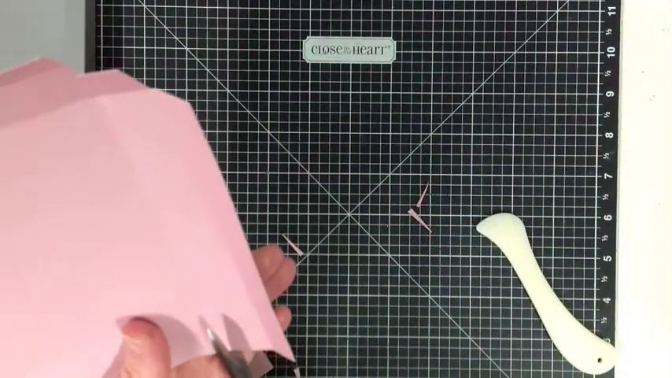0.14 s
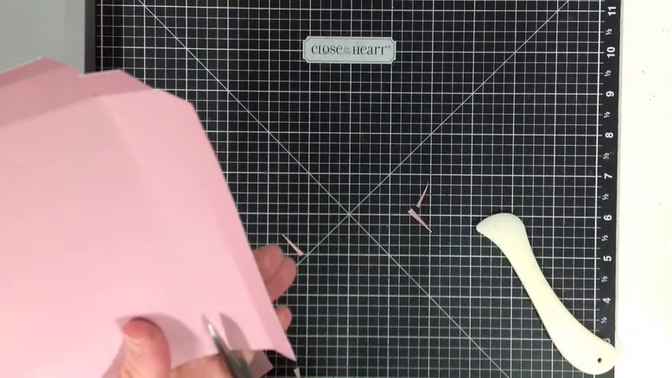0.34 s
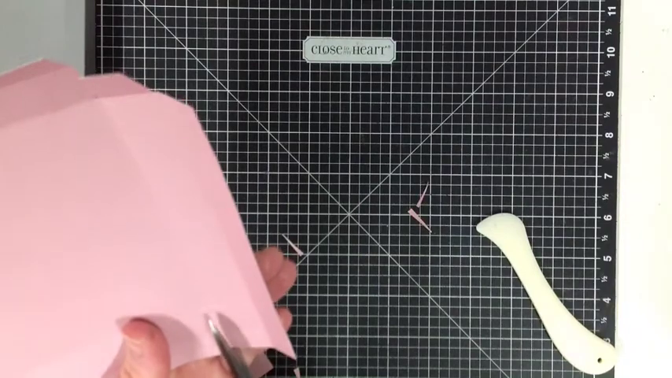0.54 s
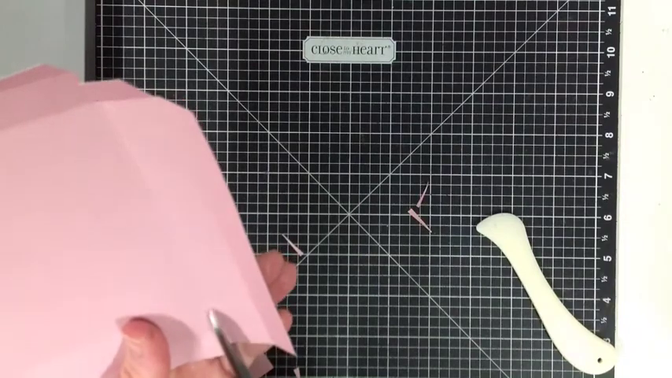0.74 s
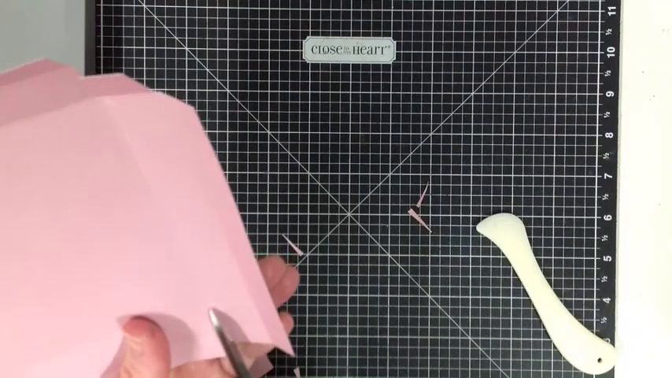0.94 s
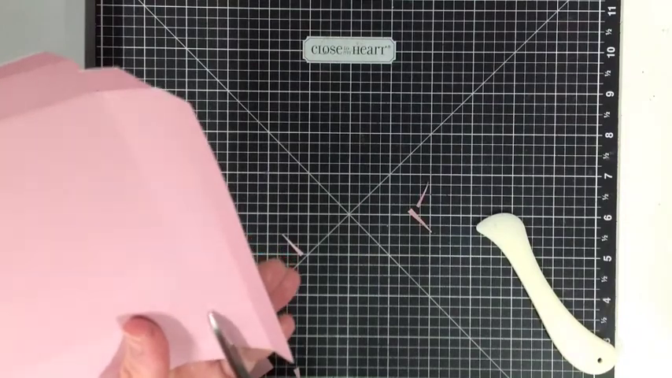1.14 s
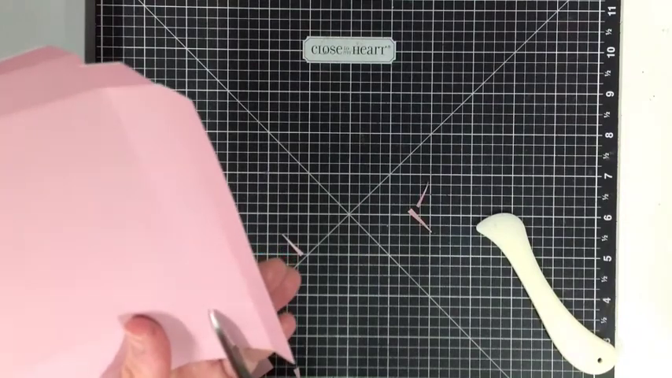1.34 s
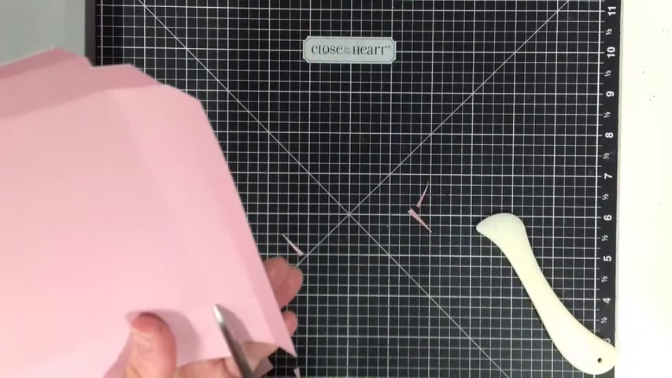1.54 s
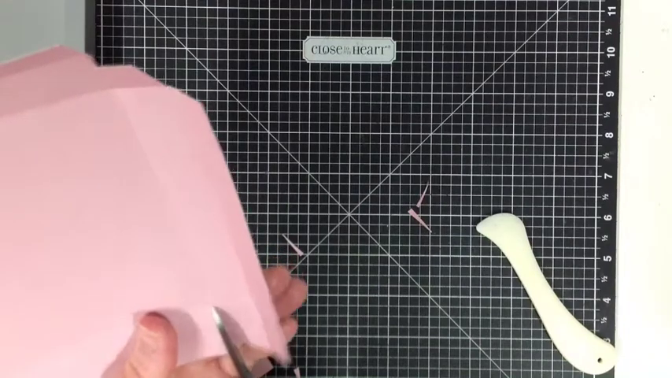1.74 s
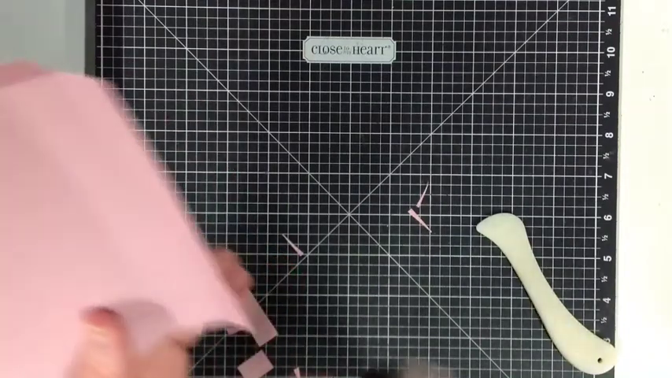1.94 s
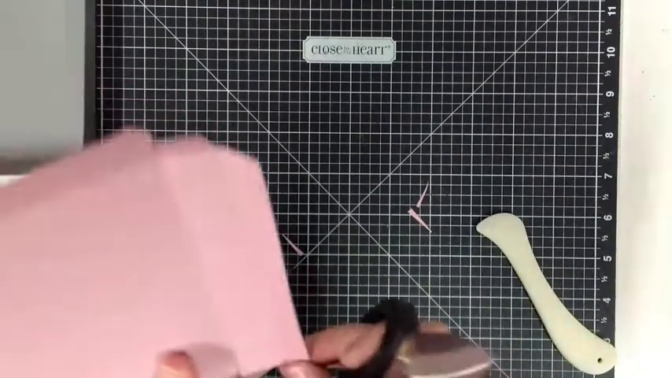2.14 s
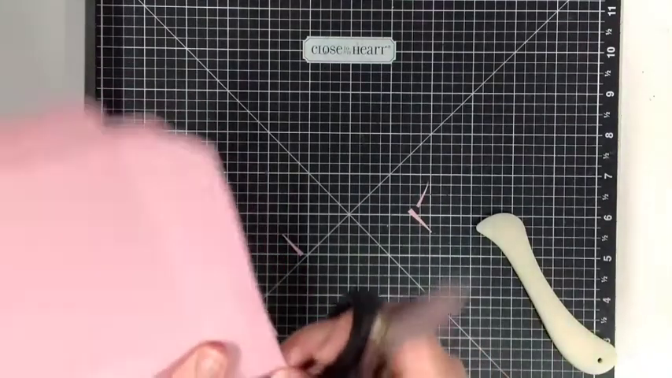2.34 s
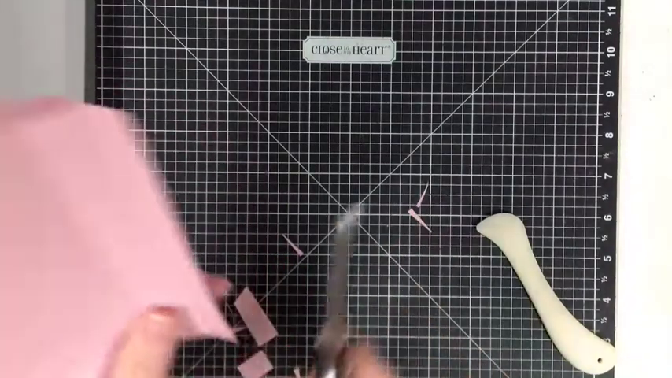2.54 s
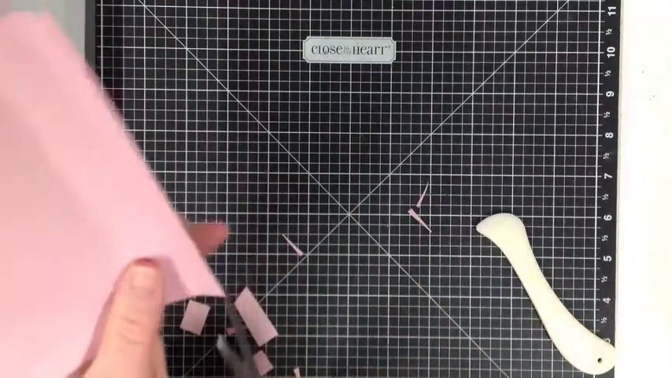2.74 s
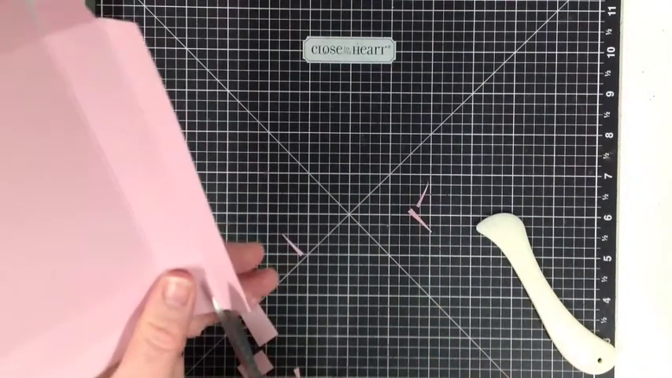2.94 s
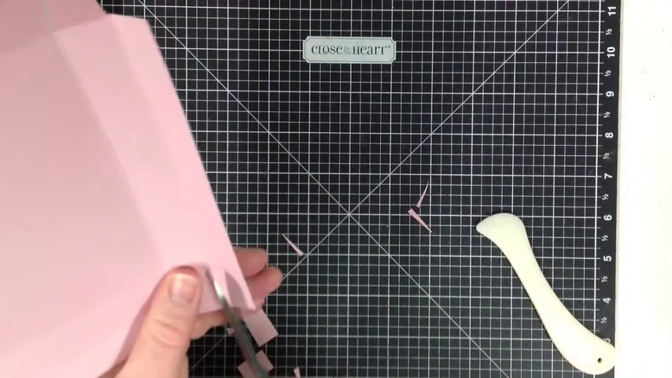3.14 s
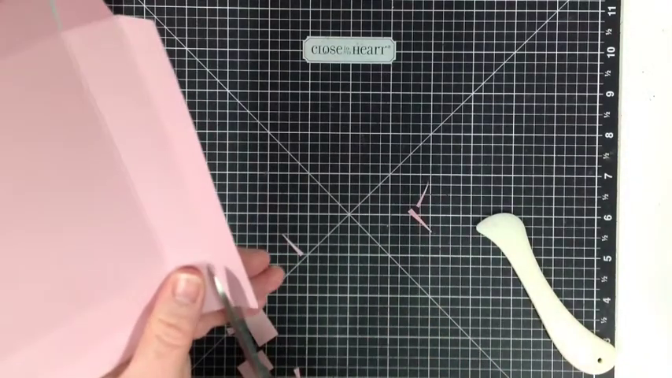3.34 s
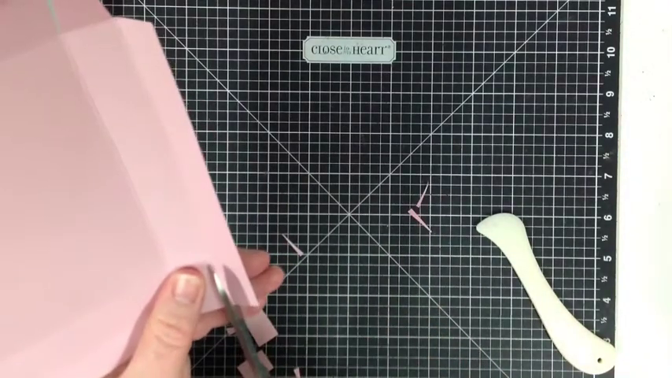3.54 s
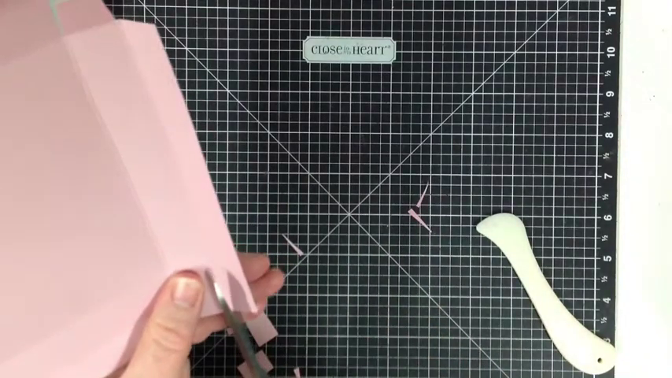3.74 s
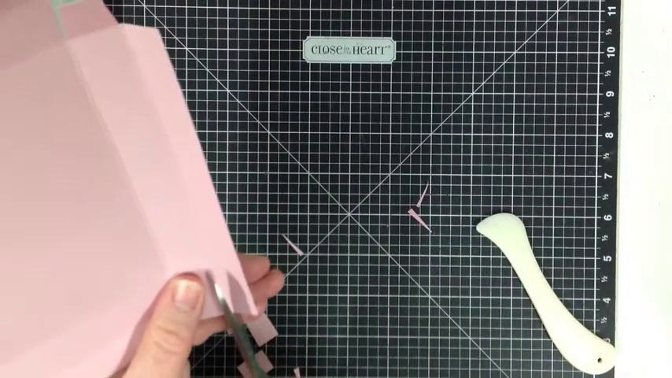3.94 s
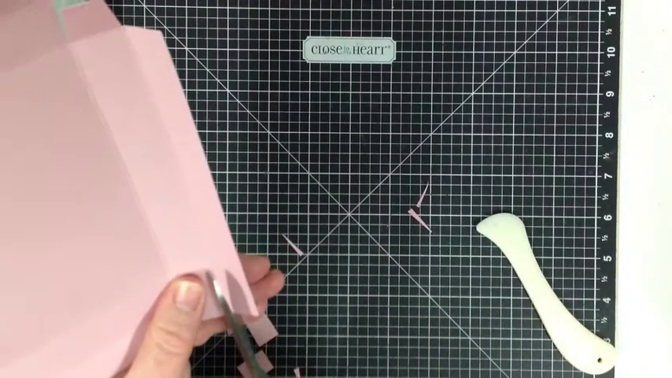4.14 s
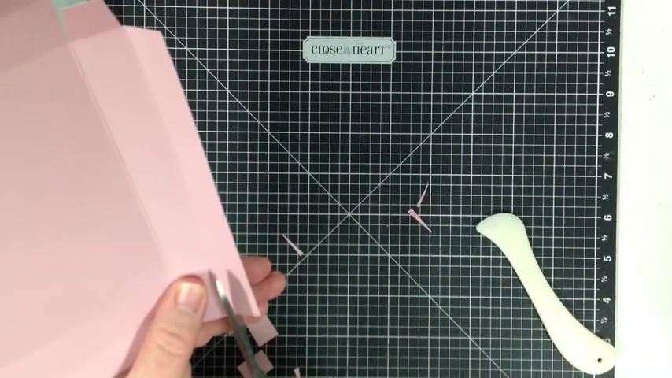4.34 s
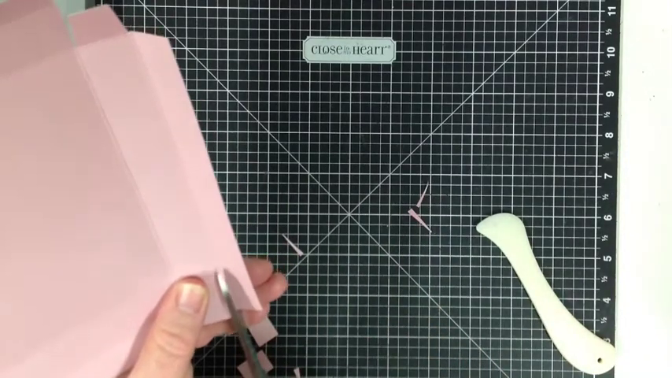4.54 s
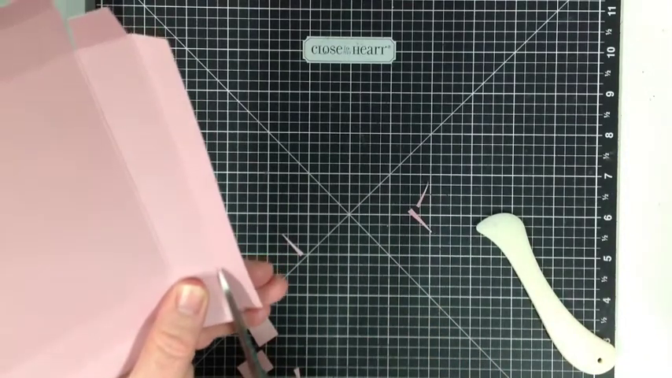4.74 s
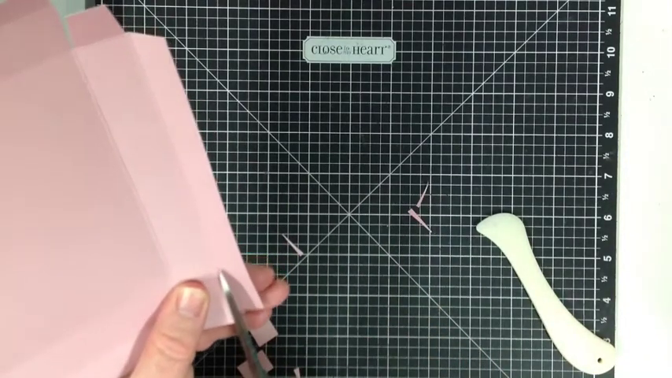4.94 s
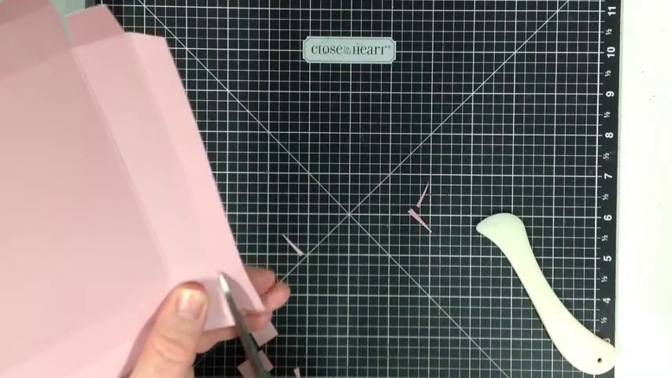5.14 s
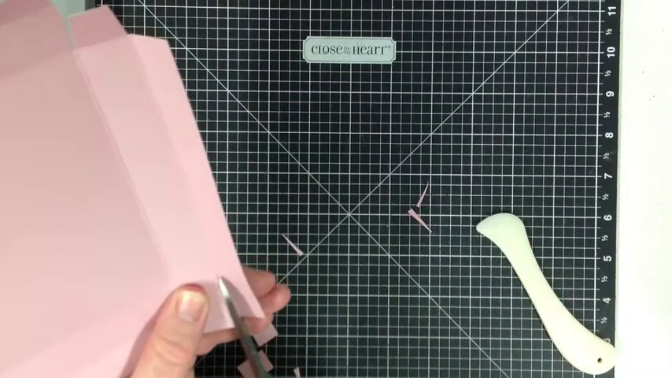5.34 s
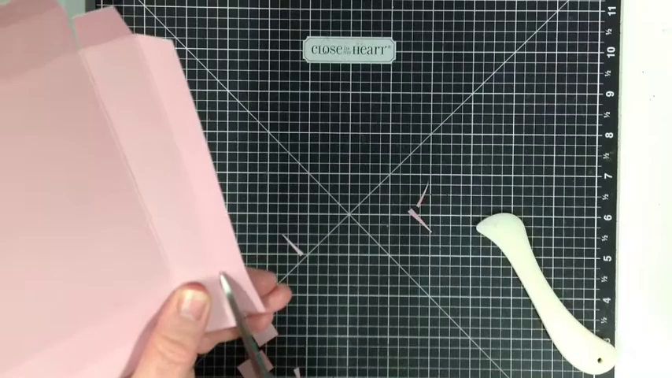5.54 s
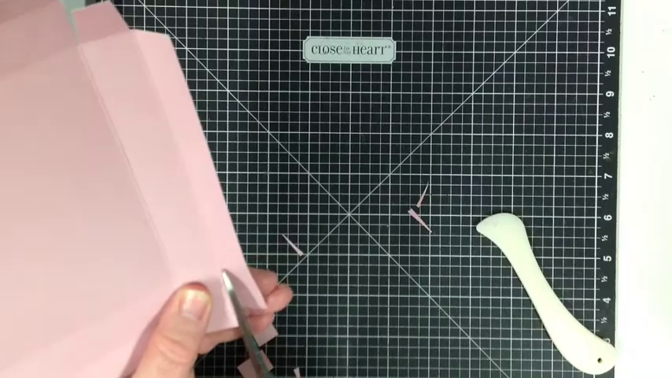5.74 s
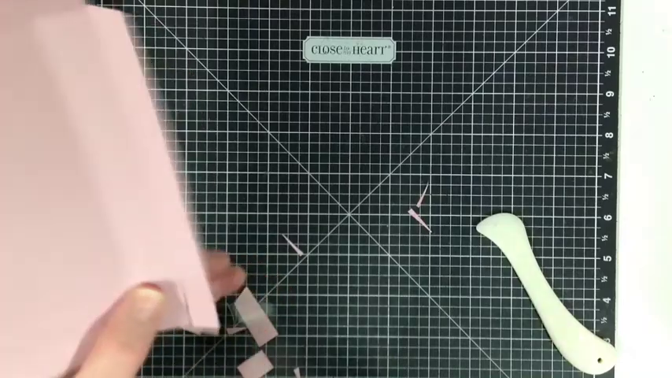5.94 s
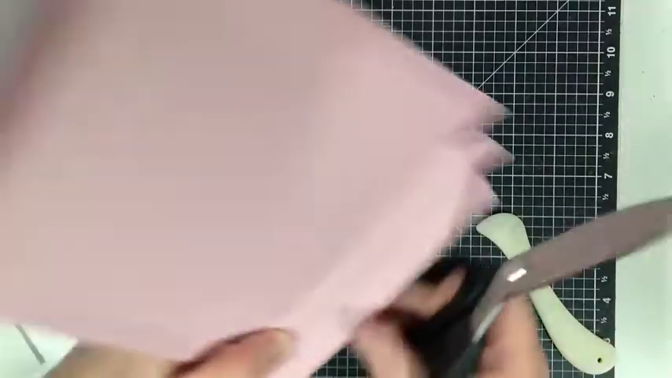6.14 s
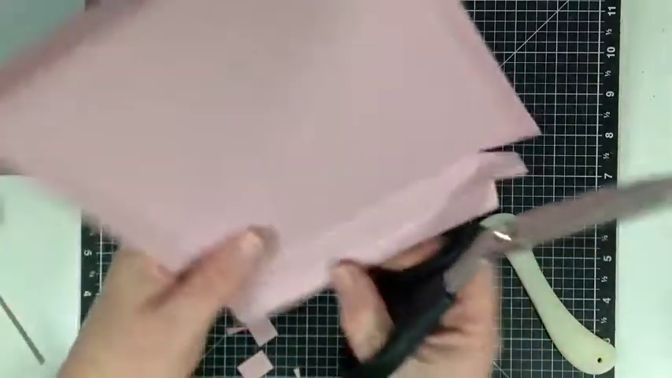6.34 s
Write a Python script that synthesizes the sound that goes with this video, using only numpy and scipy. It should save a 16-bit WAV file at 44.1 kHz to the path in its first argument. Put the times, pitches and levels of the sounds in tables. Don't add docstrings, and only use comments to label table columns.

```python
import sys
import numpy as np
from scipy import signal
from scipy.fft import rfft, irfft
from scipy.io import wavfile

SR = 44100
rng = np.random.default_rng(int(sys.argv[2]) if len(sys.argv) > 2 else 0)


def ratio(d):
    e = np.asarray(d, float) / 20
    return 10 ** e


def wav_out(sig):
    wavfile.write(sys.argv[1], SR, np.round(np.clip(np.atleast_2d(sig).T, -1, 1) * 32767).astype(np.int16))


N = 286209


def rms_one(x):
    return x / np.sqrt(np.mean(x ** 2) + 1e-20)


def in_time(rows, outside=None):
    s, *columns = np.transpose(rows)
    t = np.arange(N) / SR
    return np.array([np.interp(t, s, column, outside, outside) for column in columns])


def drift(per_s, size):
    points = rng.standard_normal(int(size * per_s / SR) + 2)
    return np.interp(np.arange(size) * per_s / SR, np.arange(len(points)), points) * 1.22


def resonate(x, modes):
    out = 0
    for k, (hz, width_hz, db) in enumerate(modes):
        r = np.exp(-np.pi * width_hz / SR)
        zeros = [(1 - r * r) / 2, 0, (r * r - 1) / 2]
        poles = [1, -2 * r * np.cos(2 * np.pi * hz / SR), r * r]
        out = out + (-1) ** k * ratio(db) * signal.lfilter(zeros, poles, x)
    return out


def ring(hz, t60, size):
    t = np.arange(size) / SR
    return np.sin(2 * np.pi * hz * t) * ratio(-60 * t / t60)


def burst(s, rise_ms, fall_ms):
    at = np.arange(max(round((s - .07) * SR), 0), min(round((s + .08) * SR), N))
    ms = (at / SR - s) * 1000
    rise = np.exp(-1.2 * (ms / max(rise_ms, .3)) ** 2)
    fall = np.exp(-(np.abs(ms) / max(fall_ms, .3)) ** 1.6)
    return at, np.where(ms < 0, rise, fall)


# frequency in Hz, level in dB per Hz.
HISS = [(15, -48), (25, -24), (75, -19.5), (91, -19), (214, -3.5), (320, -11), (454, -5), (548, -9.5),
        (938, -9), (1440, -13.5), (2670, -14), (3690, -16.5), (15300, -18)]


def hiss():
    hz, db = np.transpose(HISS)
    bins = np.maximum(np.fft.rfftfreq(N, 1 / SR), 1)
    colour = ratio(np.interp(np.log(bins), np.log(hz), db))
    return ratio(-64.5) * rms_one(irfft(rfft(rng.standard_normal(N)) * colour, N))


# time in seconds, level in dB.
RUMBLE = [(0, -72), (3.9, -75.5), (4.6, -70), (5.2, -71.5), (5.8, -67.5), (6.49, -71)]
# time in seconds, firing rate in Hz, level in dB, favoured pitch in Hz.
ENGINE = [
    (4.3, 73.7, -100, 150),
    (4.6, 77.5, -74, 160),
    (4.9, 81, -75, 246),
    (5.1, 81.7, -72, 189),
    (5.22, 82, -65, 204),
    (5.45, 84.9, -68.5, 254),
    (5.65, 90, -82, 241),
    (6.1, 95.3, -66.5, 207),
    (6.49, 96, -69, 200),
]
FAVOURED_WIDTH_HZ, ELSEWHERE_DB, ORDER_SWAY_DB = 36, -20, 2


def street():
    hz, level_db, favoured_hz = in_time(ENGINE)
    turns = 2 * np.pi * np.cumsum(hz) / SR
    engine = 0
    for order in (1, 2, 2.5, 3):
        off_favoured = (order * hz - favoured_hz) / FAVOURED_WIDTH_HZ
        path_db = ELSEWHERE_DB * (1 - np.exp(-off_favoured ** 2))
        sway_db = ORDER_SWAY_DB * drift(7, size=N)
        engine = engine + np.sqrt(2) * ratio(level_db + path_db + sway_db) * np.sin(order * turns)
    on = np.arange(N) > ENGINE[0][0] * SR
    rumble = resonate(rng.standard_normal(N), [(102.6, 39, -2.5), (177.0, 45, 4.0), (312, 82, 0.5)])
    return on * engine + ratio(in_time(RUMBLE)[0]) * rms_one(rumble)


# peak in seconds, rise in ms, fall in ms, level in dB.
NIBBLING = [(0.257, 1, 4, -67), (0.389, 2, 6.9, -54.5), (0.418, 1, 1.6, -51.5), (0.424, 3.8, 4.7, -54),
            (0.451, 0.91, 2.4, -55), (0.458, 3, 6.4, -53), (0.479, 1.2, 2.8, -56.5), (0.525, 2.3, 16, -56),
            (0.552, 2.3, 2.7, -53), (0.572, 1.5, 4.8, -51), (0.59, 23, 5, -56), (0.605, 1, 2, -56)]
FIRST_CUT = [(0.637, 1.2, 2.6, -40.5), (0.642, 5.1, 6.1, -47), (0.668, 3.2, 5.6, -44.5),
             (0.686, 5.3, 10, -48.5), (0.713, 9.7, 9.9, -49.5), (0.733, 4, 5.6, -49),
             (0.755, 4.9, 6.6, -51.5), (0.847, 4.6, 4.6, -42.5), (0.868, 2.8, 1.3, -45),
             (0.883, 1.4, 5, -43.5), (0.875, 10, 3.2, -48), (0.899, 8.4, 5.7, -47.5), (0.914, 4, 5, -52),
             (0.94, 3, 0.9, -56), (1.183, 3, 16, -62), (1.215, 7.7, 8.4, -58.5)]
SECOND_CUT = [(1.528, 0.72, 4.6, -46), (1.538, 0.87, 3.8, -49), (1.566, 1.4, 8.5, -42),
              (1.593, 1.4, 8, -43.5), (1.604, 6, 8.5, -43), (1.619, 8, 1.8, -46), (1.6345, 1.1, 3.3, -34.5),
              (1.646, 3, 9.9, -50), (1.75, 12, 13, -60), (1.799, 11, 13, -52), (1.823, 7.1, 14, -41.5),
              (1.845, 9.4, 5.9, -31), (1.8535, 2.9, 4.5, -28.5), (1.862, 4, 9.2, -43)]
THIRD_CUT = [(3.569, 1.1, 1.5, -64), (4.361, 1.4, 2.1, -62), (4.424, 0.7, 2.3, -54.5),
             (4.43, 1.5, 1.6, -59), (4.461, 4.3, 5.7, -51), (4.499, 1.1, 14, -56), (4.504, 1.7, 3.2, -47.5),
             (4.531, 1.7, 7.6, -51), (4.547, 2, 9.7, -54.5), (4.568, 1.7, 1.4, -51), (4.582, 2.6, 6.4, -50),
             (4.591, 3.3, 4, -51), (4.601, 1.2, 2.8, -53), (4.609, 0.85, 2.7, -55.5), (4.624, 1.1, 1, -57),
             (4.646, 1, 1, -53), (4.658, 7.3, 2, -53), (4.669, 1, 4, -54), (4.681, 2.6, 4, -50.5),
             (4.697, 2.3, 4.3, -44), (4.717, 3.8, 4.5, -49.5), (4.738, 1, 2.5, -51), (4.752, 1.7, 3.2, -50),
             (4.778, 1, 3, -48), (4.783, 1.1, 5, -44.5), (4.808, 0.9, 5.1, -48.5), (4.835, 2.7, 3.4, -51),
             (4.846, 1.4, 2.3, -49)]
FOURTH_CUT = [(5.04, 3.8, 8.5, -47.5), (5.062, 4.6, 3.2, -49.5), (5.074, 4.6, 5.4, -47),
              (5.086, 1.5, 2.4, -43.5), (5.596, 3, 4, -61), (5.614, 1.9, 3.6, -50), (5.641, 1.8, 4.3, -44),
              (5.668, 1.5, 3, -49), (5.673, 3.1, 3.5, -38.5), (5.693, 9.3, 8.7, -67), (5.857, 14, 38, -63),
              (5.885, 10.2, 7.4, -48), (5.897, 8.8, 6.5, -42), (5.944, 36, 11, -50)]
# peak in seconds, rise in ms, fall in ms, level in dB.
REOPENING = [
    (2.179, 0.56, 3.9, -50),
    (2.399, 0.62, 2.1, -49.5),
    (2.463, 33, 3, -53.5),
    (2.4652, 2.1, 1.3, -34),
    (2.468, 1, 1.7, -39),
    (2.63, 7.2, 27, -61),
    (2.67, 11, 10, -64),
    (2.705, 2, 1, -67),
]
# peak in seconds, rise in ms, fall in ms, level in dB.
TURNING = [(6.1852, 0.3, 13.8, -41), (6.255, 0.94, 2.6, -47), (6.281, 0.84, 2.9, -37),
           (6.324, 3.8, 1.3, -45), (6.333, 1.1, 2.3, -41), (6.3695, 1.6, 3.5, -37), (6.379, 2.6, 2.9, -36),
           (6.387, 3.1, 6.7, -37), (6.426, 3.7, 18, -47.5), (6.447, 6.7, 3.3, -45), (6.47, 1, 1.7, -51)]
# peak in seconds, rise in ms, fall in ms, level in dB.
FLEXES = [(1.451, 5, 2.4, -60), (1.553, 0.92, 3.7, -60), (1.852, 3.4, 6, -42), (1.872, 17, 16, -49),
          (2.197, 1.1, 5.1, -58.5), (2.399, 0.55, 2.2, -52.5), (2.478, 0.76, 1.8, -46.5),
          (2.494, 9.5, 2.7, -55.5), (6.195, 6.8, 7.2, -50), (6.379, 4, 3.9, -40), (6.41, 14, 7.8, -57.5),
          (6.447, 7.7, 3.6, -57)]
# peak in seconds, rise in ms, fall in ms, level in dB.
SETTLING = [
    (3.435, 10, 12, -70),
    (3.736, 1.4, 2.4, -62),
    (3.76, 8.8, 8, -66),
    (5.213, 6, 11, -62.5),
    (5.43, 4, 4, -66),
    (5.466, 2.4, 4, -62),
]
# table of slips, steel level in dB and belly level in dB, both relative to the card.
STROKES = [
    (NIBBLING, 1.1, -9.5),
    (FIRST_CUT, -2.3, -7),
    (SECOND_CUT, -1, -14),
    (REOPENING, 2.5, -5.5),
    (THIRD_CUT, 3.7, -5.5),
    (FOURTH_CUT, 2.8, -7.5),
    (TURNING, -6.5, -7.5),
    (FLEXES, -6, 7.2),
    (SETTLING, -4, -3),
]


def fibres(per_s, spread_db):
    sizes = ratio(spread_db * np.minimum(rng.exponential(1, N), 5)) * rng.choice([-1, 1], N)
    breaks = rms_one(sizes * (rng.random(N) < per_s / SR))
    for slips, *_ in STROKES:
        for s, rise_ms, *_ in slips:
            if rise_ms < 1.7:
                at = round(s * SR)
                breaks[at] = ratio(11) * np.sign(sizes[at])
    return breaks


# steel level in dB, belly level in dB, then pressure as pairs of time in seconds and level in dB.
RUBBING = [
    (5, -2, [(0.37, -85), (0.618, -65), (0.748, -84), (0.97, -80)]),
    (-7, -8, [(1.15, -70), (1.3, -68)]),
    (4, 0, [(1.5, -71.5), (1.738, -73), (1.862, -64), (1.95, -84)]),
    (4, -8, [(2.178, -62.5), (2.23, -59.5), (2.354, -58), (2.462, -76.5), (2.73, -72.5)]),
    (-3, 3, [(3.38, -90), (3.8, -79)]),
    (1.5, 1.5, [(4.4, -78), (4.678, -64.5), (4.834, -67), (4.9, -75)]),
    (-13, -2, [(5.02, -75), (5.228, -70.5), (5.5, -76), (5.9, -76)]),
    (2, -7, [(5.9, -67), (6.186, -71)]),
    (3.5, -2.5, [(6.186, -57.5), (6.248, -59), (6.362, -54), (6.434, -61), (6.49, -68)]),
]


def strain():
    power = np.zeros((3, N))
    for steel_db, belly_db, pressure in RUBBING:
        share_db = np.array([[0], [steel_db], [belly_db]])
        power += ratio(2 * (in_time(pressure, outside=-150) + share_db))
    for slips, steel_db, belly_db in STROKES:
        share_db = np.array([[0], [steel_db], [belly_db]])
        for s, rise_ms, fall_ms, db in slips:
            at, shape = burst(s, rise_ms, fall_ms)
            power[:, at] += ratio(2 * (db + share_db)) * shape
    return np.sqrt(power)


GRIPS = [0, 1.1, 2.05, 4.2, 5.8, 6.15]
# frequency in Hz, width in Hz, then level in dB in grips 1 to 6.
CARD = [(986, 490, 5, 5.5, -6.5, -2.5, -3, -0.5), (1385, 523, 5.5, 5, 3, -0.5, 0.5, 2),
        (1810, 165, 3, -2, 3.5, -2, 1.5, 3), (2250, 440, -0.5, -3.5, -1.5, -7, -2, -3),
        (3150, 550, 2.5, 2, 4.5, -0.5, 1, 2), (3630, 1010, 1, 1, 1.5, -6, -3, -2.5),
        (1120, 43, -19, -4, 0, -9, -11, -17), (1570, 47, -5, 3.5, -6, -12, -7, -6)]
STEEL = [(4290, 590, 1, -1, 4, -4, 4.5, 0), (5030, 1140, -3.5, -2.5, 3, -1.5, 3, 1.5),
         (6300, 1460, -4, -2, 3, -1, 1.5, -0.5), (7390, 810, 2.5, 2.5, 5, 3.5, 3, 2.5),
         (9230, 3500, -3.5, -4, 1.5, -3, 2.5, 0.5), (11620, 3200, -3.5, -3, 2.5, -3, 3, 1.5),
         (14300, 2800, -9, -7.5, -0.5, -12.5, -1, -2), (6250, 66, -6, 6, -3, 1, -7, -6),
         (7430, 55, 0, 4.5, -3, 4, -4, -6), (3144, 66, -4, 5, -5, 1, -6, -9)]
BELLY = [(206, 97, -6.5, -3.5, 1, -6, -0.5, -9.5), (339, 104, 2.5, 3.5, 3.5, -4, 5, 4.5),
         (434, 178, 1.5, 0.5, 2.5, -3, 1.5, 1.5), (720, 81, -2.5, -7.5, -23, 0.5, -4.5, 3.5)]


def tearing(breaks):
    out = np.zeros(N)
    edges = [round(s * SR) for s in GRIPS] + [N]
    for pull, body in zip(strain(), (CARD, STEEL, BELLY)):
        force = pull * breaks
        for grip, (start, end) in enumerate(zip(edges, edges[1:])):
            modes = [(hz, width_hz, db[grip]) for hz, width_hz, *db in body]
            scale = np.linalg.norm(resonate(signal.unit_impulse(SR // 10), modes))
            for k, mode in enumerate(modes):
                met = ratio(1.2 * drift(55, size=end - start))
                out[start:end] += (-1) ** k * resonate(force[start:end] * met, [mode]) / scale
    return out


# time in
# seconds, peak in dB, pitch in Hz.
CRACKS = [(0.3893, -46, 1210), (0.4186, -41, 7280), (0.4226, -43, 1640), (0.4579, -45, 7490),
          (0.5531, -38, 7190), (0.573, -43, 1390), (0.6043, -39, 4440), (0.668, -36, 1420),
          (0.7015, -43, 3190), (0.8475, -33, 1320), (0.8646, -36, 1160), (0.8689, -35, 1210),
          (0.8821, -37, 1120), (0.8983, -37, 1250), (1.5242, -52, 8530), (1.5373, -37, 2330),
          (1.5404, -45, 1030), (1.5523, -43, 2300), (1.552, -46, 12000), (1.5687, -32.5, 1030),
          (1.5984, -32, 3450), (1.6028, -34, 3060), (1.6337, -29, 1160), (1.8108, -44, 8440),
          (1.8229, -30, 7620), (1.8404, -27, 1120), (1.8622, -27, 1030), (2.1991, -49, 1160),
          (2.3988, -34.5, 2710), (2.4525, -42, 7750), (2.4655, -24, 6200),
          (3.5688, -46, 7800), (3.7366, -48, 5300), (4.4227, -40, 11240), (4.4263, -39, 9560),
                      (4.4301, -39, 7450), (4.4571, -36, 8910), (4.461, -35, 5990), (4.4994, -39, 8100),
                      (4.5035, -30, 11670), (4.5093, -34, 9600), (4.5625, -43, 10250), (4.5685, -39, 9430),
                      (4.5799, -38, 7620), (4.6243, -40, 5470), (4.6705, -41, 7410), (4.716, -41, 1340),
                      (4.7423, -48, 1030), (4.7541, -35, 7360), (4.7833, -37, 9430), (4.787, -31, 6850),
                      (4.8094, -28, 6630), (4.8466, -37, 3300), (5.0405, -31, 7920), (5.0734, -34.5, 1200),
                      (5.0858, -31, 5560), (5.4658, -50, 3400), (5.6168, -39.5, 1150), (5.6424, -27, 7300),
                      (5.6464, -32, 7150), (5.6665, -33, 5340), (5.6697, -34, 7060), (5.8615, -48, 6160),
                      (5.8866, -34.5, 1120), (5.8947, -28, 3400), (5.9085, -43, 1420), (6.1857, -34, 1160),
                      (6.2386, -46, 2280), (6.255, -35.5, 1290), (6.2918, -43, 1030), (6.317, -34, 1700),
                      (6.3237, -29, 3010), (6.3338, -24, 9300), (6.3362, -27, 8500), (6.363, -42, 8000),
                      (6.3695, -30, 1030), (6.3855, -28, 3530), (6.394, -29, 3880), (6.4307, -36, 3490),
                      (6.4434, -34, 1030), (6.4705, -40, 3270)]
CRACK_T60_S, CRACK_CYCLES, CRACK_TICK_DB = .0015, 3.5, -5


def cracks():
    size = SR // 50
    out = np.zeros(N + size)
    rows = CRACKS
    for (s, db, hz), sign in zip(rows, rng.choice([-1, 1], len(rows))):
        pulse = ring(hz, CRACK_T60_S + CRACK_CYCLES / hz, size=size)
        pulse = pulse / np.abs(pulse).max() - ratio(CRACK_TICK_DB) * signal.unit_impulse(size)
        at = round(s * SR)
        out[at:at + size] += sign * ratio(db) * pulse
    return out[:N]


# peak in seconds, fall in ms, level in dB, pitch in Hz, width in Hz.
SQUEAKS = [(1.639, 2.4, -28.5, 3100, 600), (1.852, 2.4, -31.5, 3150, 400), (1.853, 2.3, -34, 12500, 1200),
           (2.4, 2.6, -45.5, 2830, 1200), (2.468, 2.25, -29.5, 3600, 500), (2.632, 10, -62, 6700, 400),
           (2.656, 6, -61, 11900, 500), (2.667, 7, -64, 14600, 500), (2.64, 9, -67, 9700, 500),
           (2.647, 7.1, -57, 3620, 250), (2.672, 10, -64, 7300, 400), (6.317, 0.91, -35, 2110, 915),
           (6.335, 1.4, -40, 8800, 1800), (6.3754, 0.59, -28.5, 2850, 1980), (6.387, 3.8, -34, 3630, 348),
           (6.393, 2.5, -38, 3780, 400), (0.58, 6.4, -56, 2200, 250), (0.53, 8, -56, 7550, 700),
           (0.64, 4, -51, 7500, 2500), (1.54, 5, -50.5, 2250, 300), (1.605, 11, -50, 3120, 250),
           (4.754, 3, -57, 3400, 300), (4.811, 3, -55, 3230, 300), (5.042, 4.9, -54, 3400, 300),
           (5.045, 7.4, -47, 7000, 900), (5.087, 2.7, -48, 6770, 1500), (5.887, 2.5, -50, 1060, 200),
           (5.896, 3.3, -46, 3480, 500), (5.92, 12, -54, 1730, 150), (5.938, 8, -48, 5710, 300),
           (5.942, 5.5, -45, 11040, 800), (5.897, 3.6, -43, 12300, 2000), (4.812, 4.4, -53, 8000, 4000),
           (4.793, 3.5, -54, 7000, 3000), (6.325, 2.2, -44, 3100, 500)]


def squeaks(breaks):
    out = np.zeros(N)
    for s, fall_ms, db, hz, width_hz in SQUEAKS:
        at, shape = burst(s, 0.68 * fall_ms, fall_ms)
        scale = np.sqrt(np.pi * width_hz / SR / 2)
        out[at] += resonate(np.sqrt(shape) * breaks[at], [(hz, width_hz, db)]) / scale
    return out


# time in seconds, pop level in dB, pop pitch in Hz, cycles it rings, belly level in dB.
SNAPS = [
    (1.6382, -12.5, 1265, 11.8, -30),
    (5.6755, -18, 1160, 9.1, -46),
    (6.3751, -6, 990, 4.1, -39),
    (2.4661, -15, 1120, 13.3, -20),
    (1.8528, -11.5, 1245, 10.4, -22.5),
    (6.2812, -23, 760, 9.5, -36),
]
THUD_HZ = 421


def snaps():
    size = SR // 4
    out = np.zeros(N + size)
    t = np.arange(size) / SR
    thud = ring(THUD_HZ, 0.025, size=size)
    thud += 0.43 * ring(THUD_HZ * 0.777, 0.048, size=size)
    thud += 0.17 * ring(144, 0.12, size=size)
    thud *= np.tanh(t / .001)
    for s, db, pop_hz, cycles, belly_db in SNAPS:
        pop = ring(pop_hz, cycles / pop_hz, size=size)
        pop += .03 * ring(pop_hz * .97, .07, size=size)
        pop += .5 * ring(pop_hz * 2.2, .004, size=size)
        at = round(s * SR)
        out[at:at + size] -= ratio(db) * pop * np.tanh(t / .0004) + ratio(belly_db) * thud
    return out[:N]


# peak in seconds, rise in ms, fall in ms, level in dB, pitch in Hz, glide in Hz per ms.
WOBBLES = [(1.651, 4, 11, -49, 342, 0), (1.875, 14, 8.1, -36.5, 466, 4.1),
           (1.874, 9.4, 10, -46.5, 235, -0.5), (1.895, 13, 17.4, -45.5, 335, -0.5),
           (1.905, 6, 7, -50, 507, 1), (1.877, 6, 8, -44, 935, -1), (2.245, 8, 10, -51.5, 253, 0.5),
           (2.477, 2.3, 6.4, -38, 1100, 1), (2.632, 5, 9, -62, 1260, 3.1), (2.671, 6, 9.9, -61, 1270, -12),
           (5.088, 1.5, 6, -47, 1250, 0), (5.684, 3.4, 10, -48, 1005, 0.5), (6.381, 5, 8.3, -39, 440, 0),
           (6.383, 4, 10, -43, 723, 1), (6.404, 12, 20, -43.5, 344.5, 0)]


def wobbles():
    out = np.zeros(N)
    for s, rise_ms, fall_ms, db, hz, glide in WOBBLES:
        at, shape = burst(s, rise_ms, fall_ms)
        t = at / SR - s
        phase = 2 * np.pi * (hz + 500 * glide * t) * t
        out[at] += ratio(db) * np.sqrt(2 * shape) * np.sin(phase)
    return out


# delay in seconds, level in dB.
ECHOES = [(.0085, -17), (.0135, -21), (.0185, -23)]
ROOM_DB, ROOM_T60_S, WALL_CUT_HZ = -18, 0.17, 11300


def room(x):
    t = np.arange(SR // 3) / SR
    tail = rng.standard_normal(len(t)) * ratio(-60 * t / ROOM_T60_S) * (t > .006)
    answer = ratio(ROOM_DB) * tail / np.sqrt(np.sum(tail ** 2))
    for s, db in ECHOES:
        answer[round(s * SR)] += ratio(db)
    answer = signal.sosfilt(signal.butter(1, WALL_CUT_HZ, fs=SR, output="sos"), answer)
    return signal.fftconvolve(x, answer)[:N]


def scene():
    breaks = fibres(per_s=9000, spread_db=3.2)
    near = tearing(breaks) + cracks() + squeaks(breaks) + snaps() + wobbles()
    no_bass = signal.butter(4, 188, "high", fs=SR, output="sos")
    near = signal.sosfilt(no_bass, near + room(near))
    return (hiss() + street() + near)[None]


def roll_off(x):
    return signal.sosfilt(signal.butter(12, 16310, fs=SR, output="sos"), x)


def record(dry):
    top_cut = signal.ellip(10, .5, 40, 15270, fs=SR, output="sos")
    mix = signal.sosfilt(top_cut, dry)
    return roll_off(mix)


dry = scene()
out = record(dry)
wav_out(out)
```